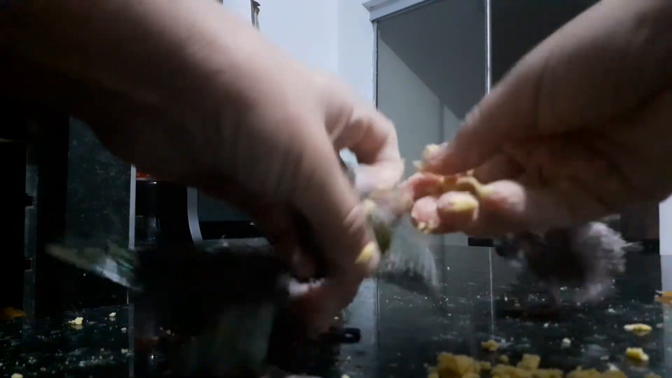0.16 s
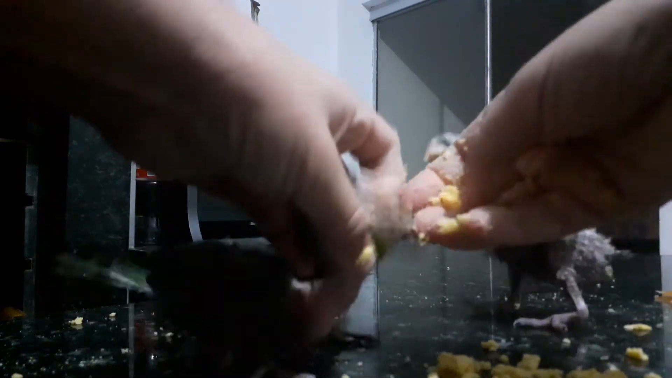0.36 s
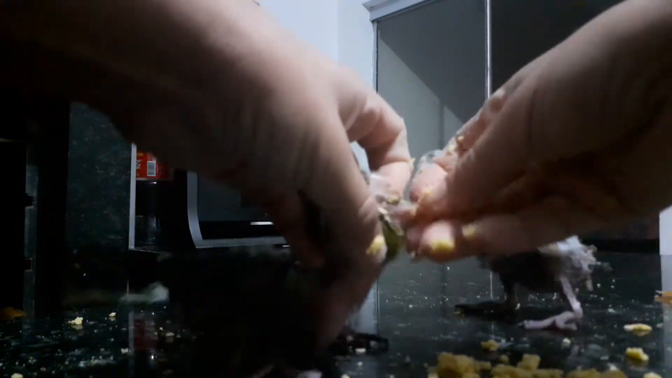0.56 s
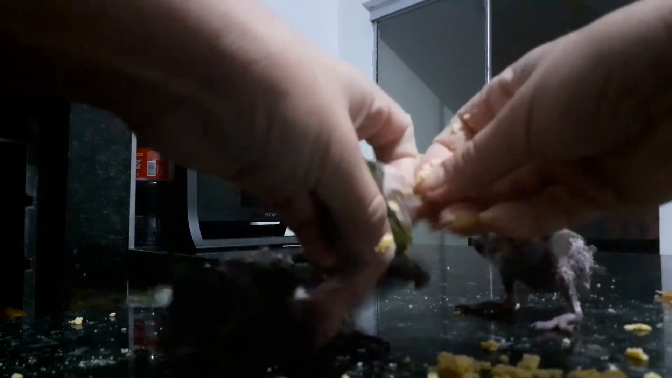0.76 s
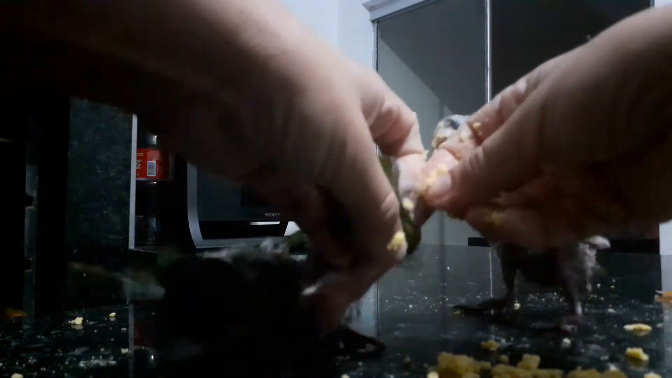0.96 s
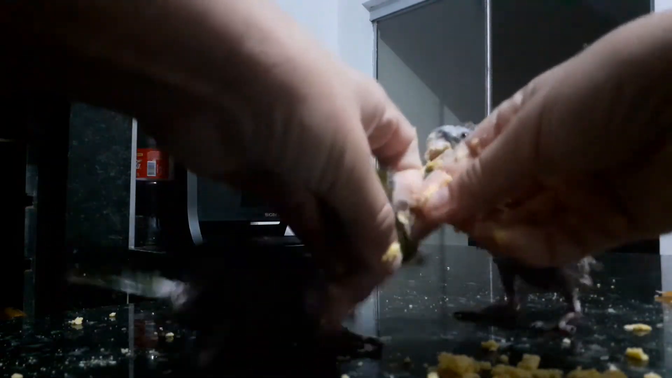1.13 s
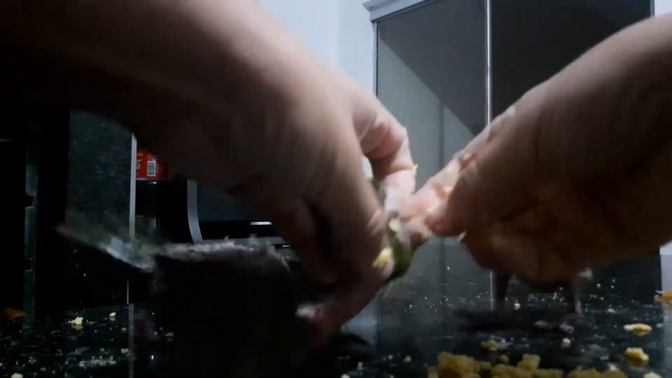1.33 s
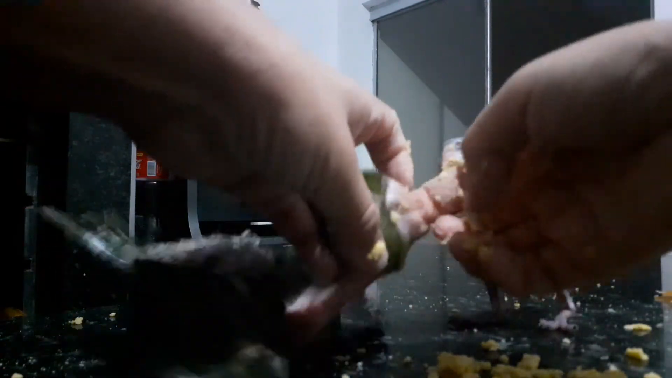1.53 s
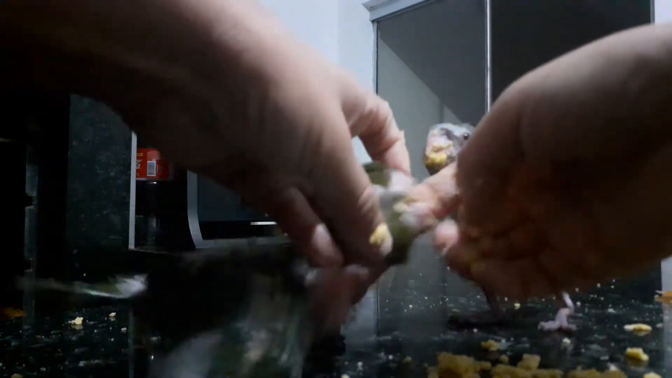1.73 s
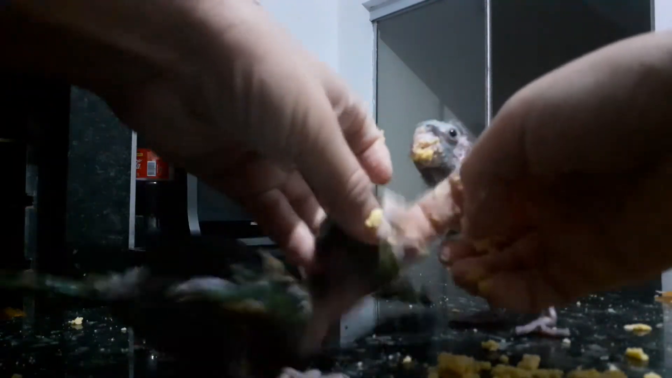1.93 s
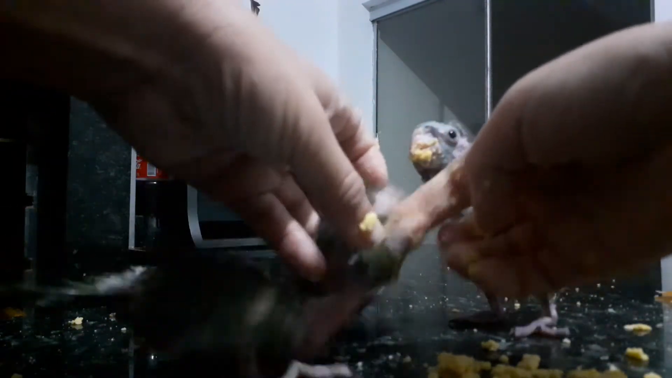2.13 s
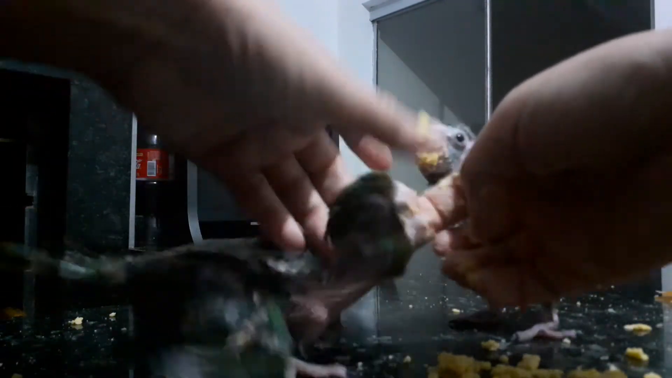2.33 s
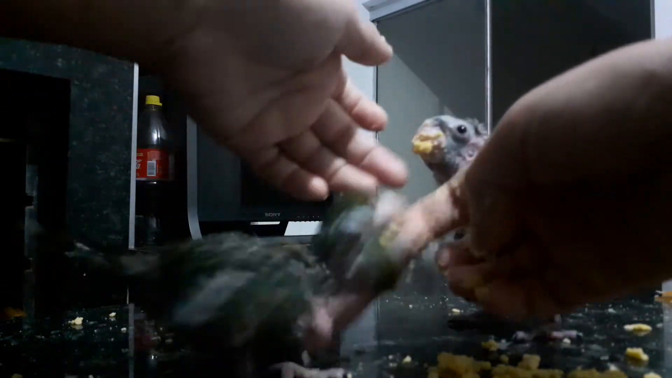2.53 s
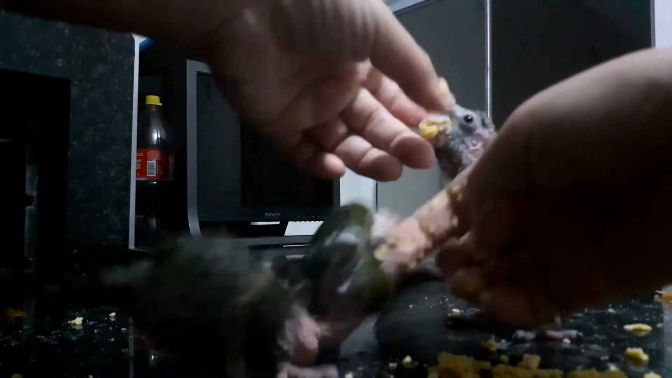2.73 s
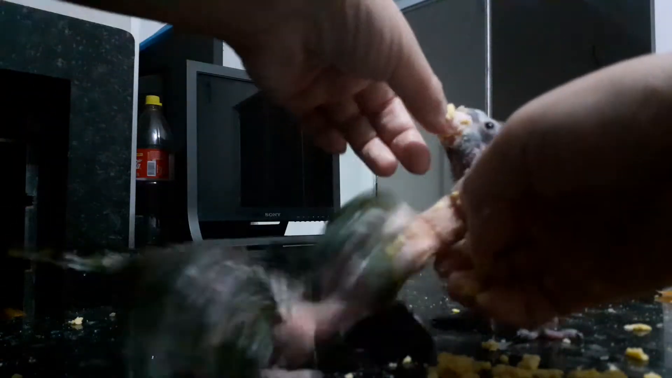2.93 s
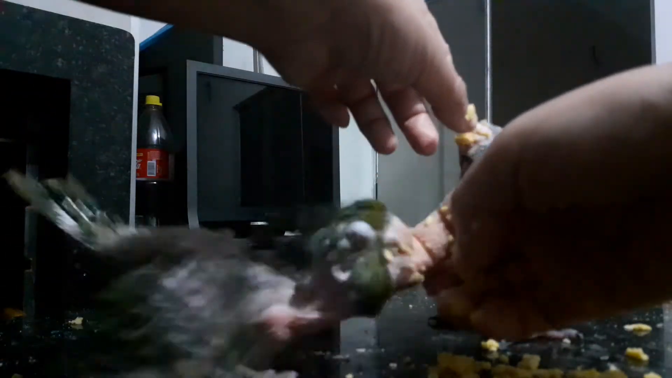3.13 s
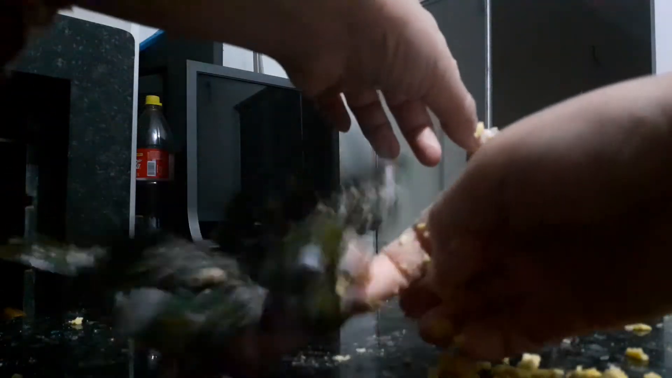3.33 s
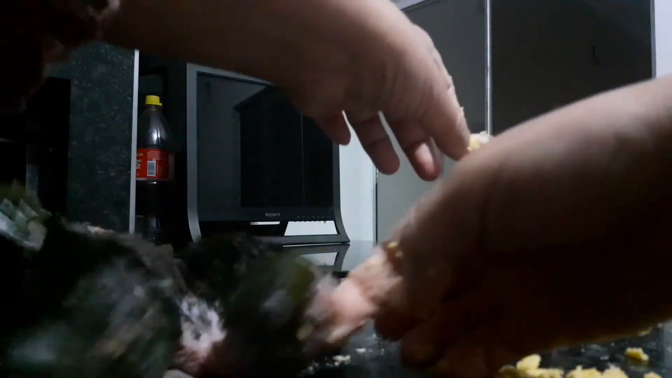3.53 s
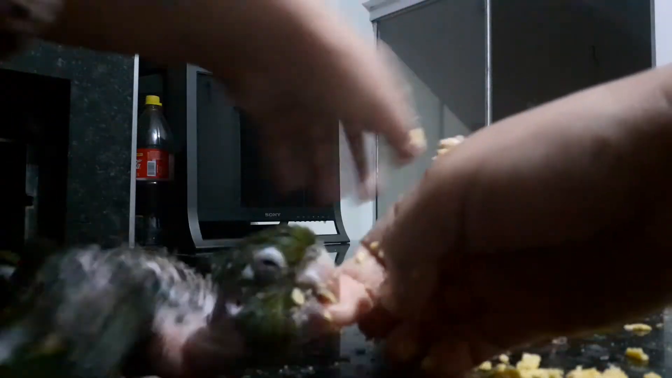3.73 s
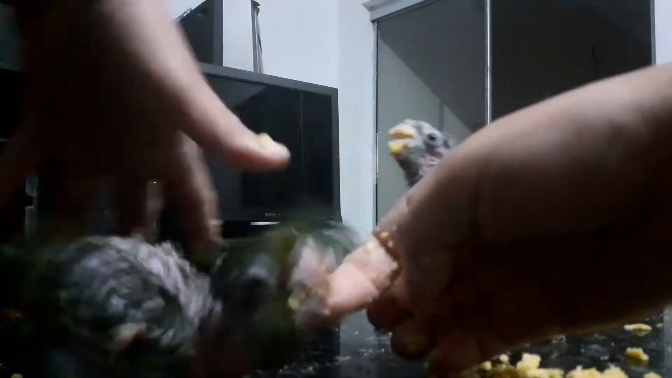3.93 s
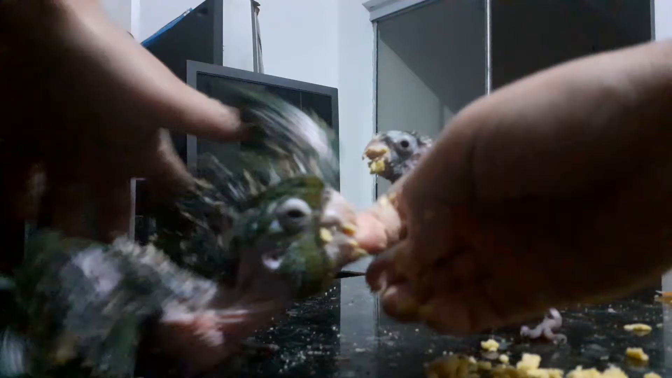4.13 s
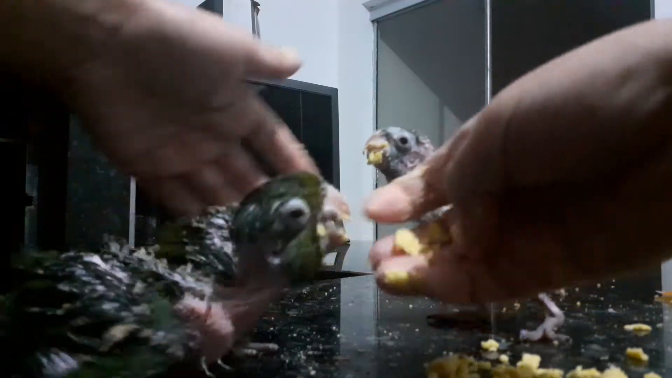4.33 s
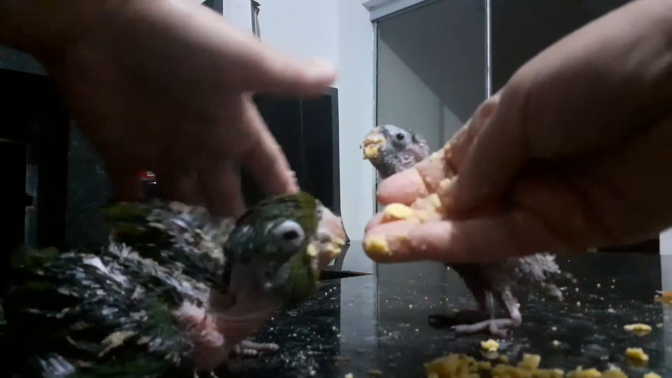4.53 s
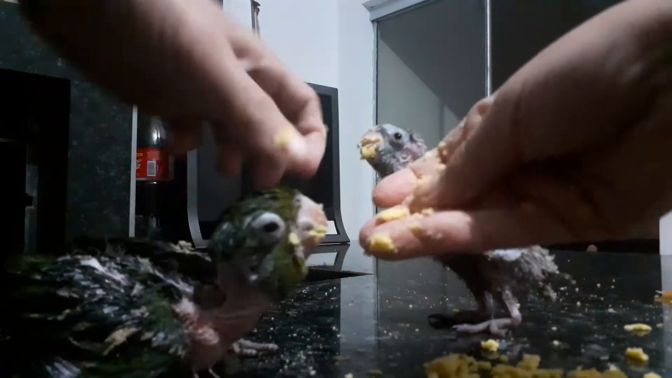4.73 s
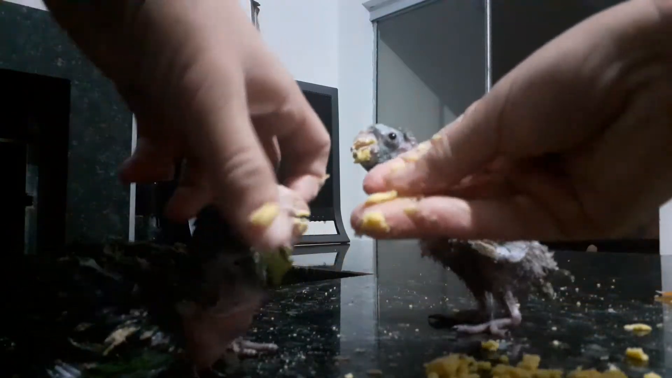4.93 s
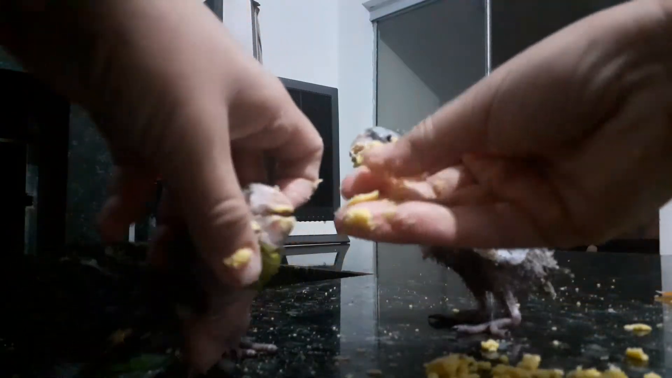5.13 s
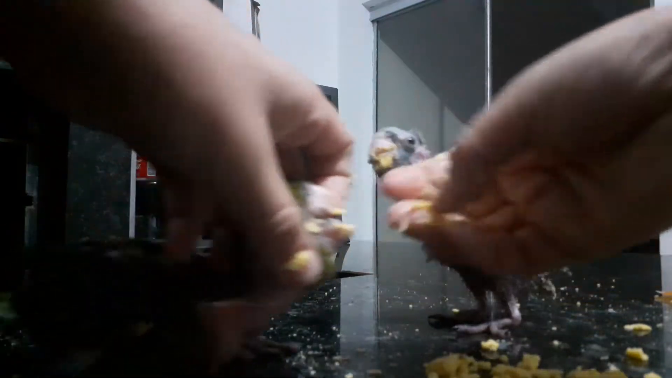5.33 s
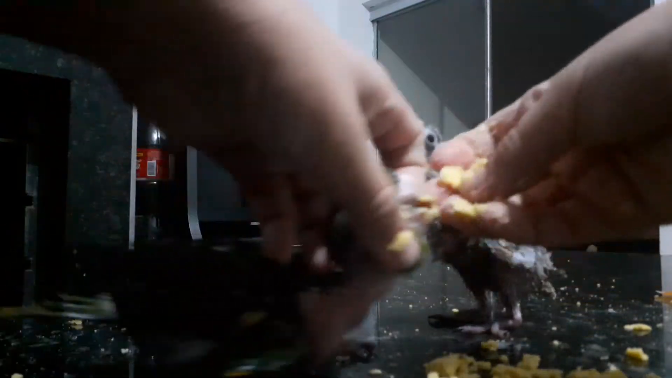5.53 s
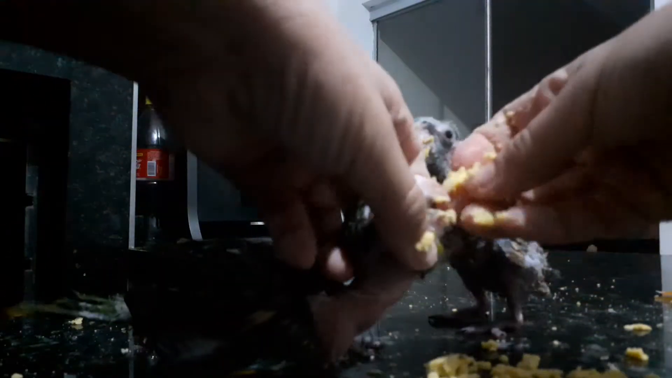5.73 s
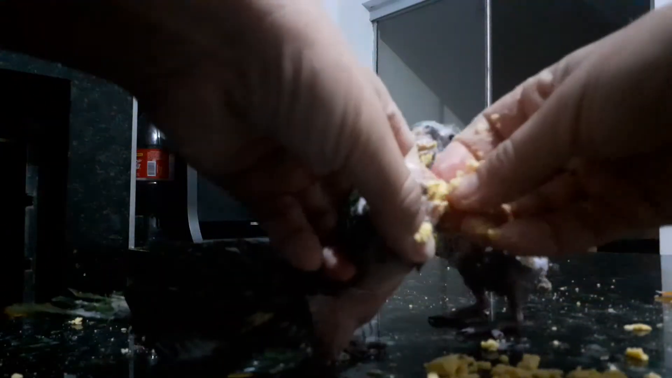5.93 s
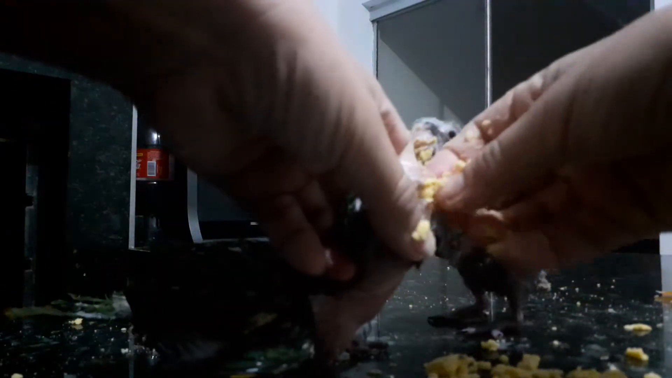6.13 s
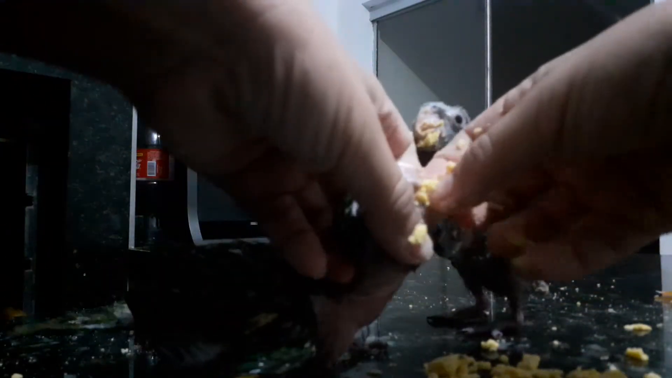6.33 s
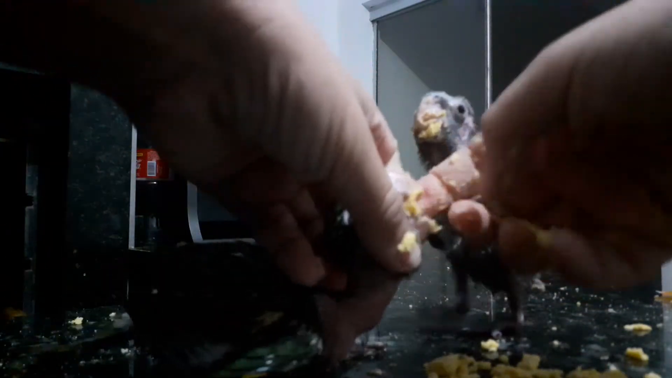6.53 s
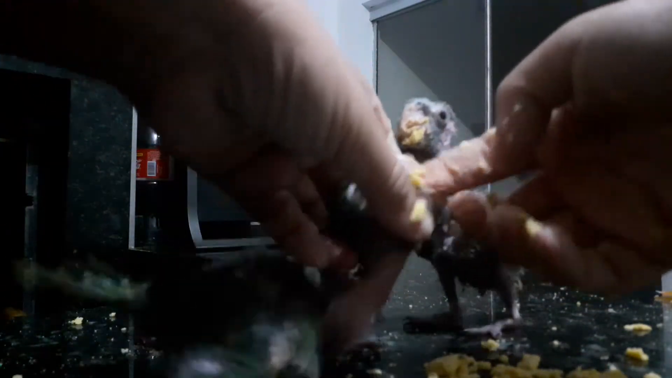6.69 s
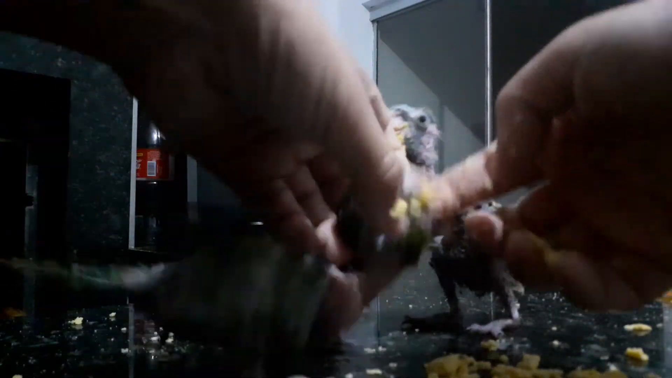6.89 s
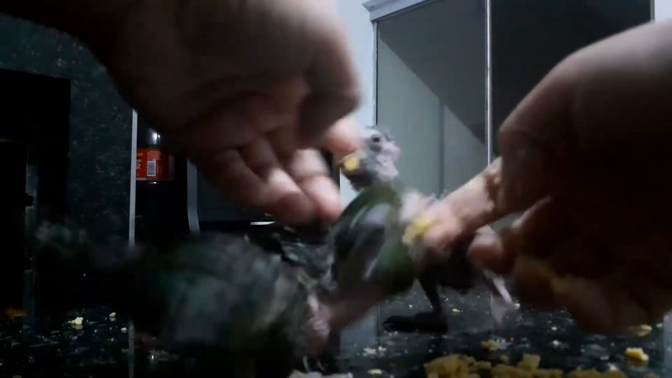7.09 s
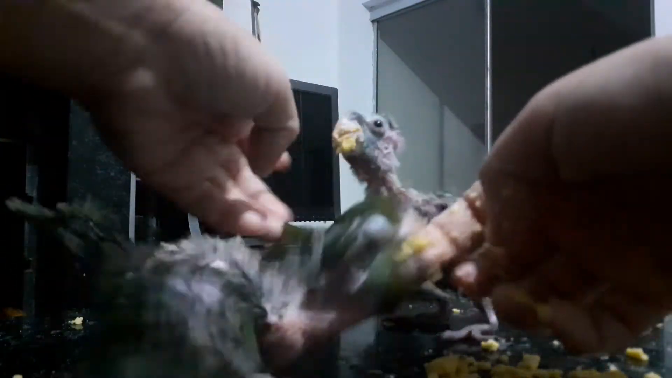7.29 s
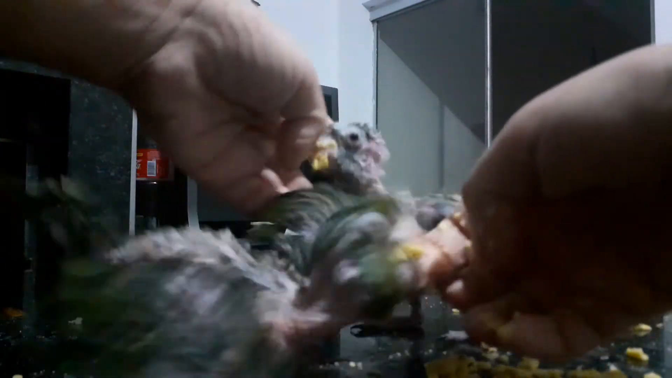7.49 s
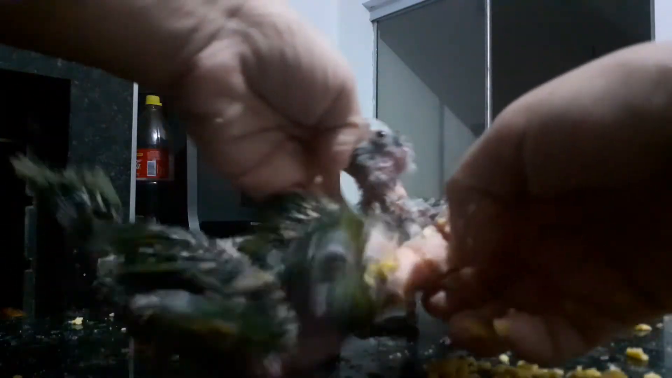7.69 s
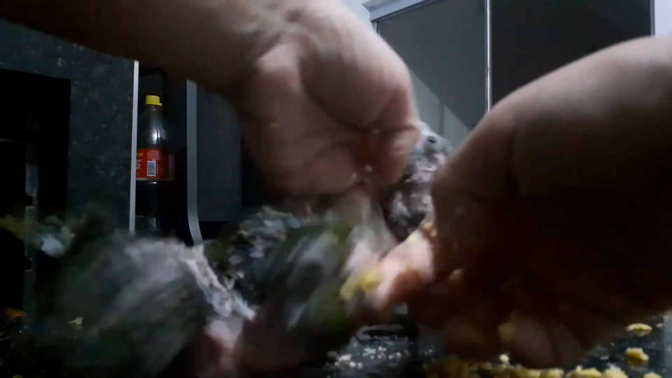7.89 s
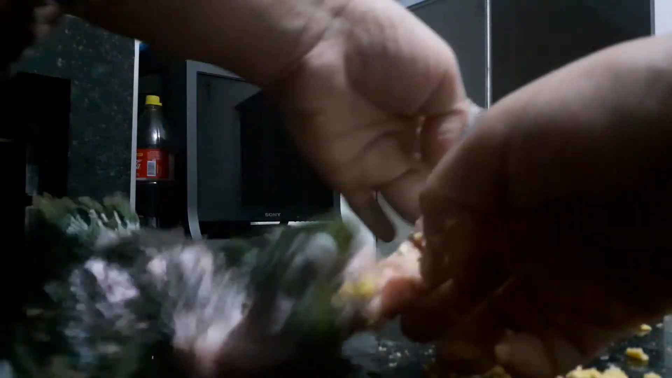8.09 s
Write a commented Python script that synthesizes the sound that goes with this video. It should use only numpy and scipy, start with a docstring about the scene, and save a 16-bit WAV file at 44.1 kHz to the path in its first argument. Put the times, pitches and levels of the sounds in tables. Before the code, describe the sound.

A steady appliance hum with soft rushing air lies under the begging of two hand-fed parrot chicks on a countertop. Both rattle together at first, then the near one continues alone, dipping quieter before growing stronger and harsher. After a pause filled only by hum and one barely audible beak click, it restarts with a few clearer, higher chirps and returns to rasping. Close stereo pickup, slightly left, short bright room echo.

```python
"""Two begging parrot chicks

Two parrot chicks beg while they are hand-fed on a stone countertop, close to the microphone, in a hard-walled room.
Each call is a short rattle of pulses from the syrinx (a bird's voice box) that ring the throat, with a rasp of air
in the open beak. The near chick calls, pauses and starts again; its stronger calls are brighter and harsher.
The farther chick joins in for a little over a second. Beaks click on the food: short bursts of coloured noise.
An appliance hums throughout: wavering tones over a rush of air.
"""
import sys
import numpy as np
from scipy import signal
from scipy.fft import rfft, irfft, next_fast_len
from scipy.io import wavfile
from scipy.ndimage import uniform_filter1d, minimum_filter1d

SR = 44100
rng = np.random.default_rng(int(sys.argv[2]) if len(sys.argv) > 2 else 0)


def transcribe(u):
    """Save the signal u as a 16-bit wav file named by the first command-line argument.

    u: samples, shape (n,) or (channels, n), limited to [-1, 1]; the rate is SR.
    q: integer samples, one column per channel.
    """
    v = np.clip(np.atleast_2d(u).T, -1, 1)
    q = np.round(v * 32767).astype(np.int16)
    wavfile.write(sys.argv[1], SR, q)


N = 359415
TIME = np.arange(N) / SR
CALL_SIZE = 4096  # samples set aside for one call or click


def undb(db):
    """Decibels to gain."""
    return 10 ** (np.asarray(db) / 20)


def unit(x):
    """Scale to rms 1."""
    return x / np.sqrt(np.mean(x ** 2) + 1e-20)


def curve(rows, t):
    """Read (t/s, value) rows at time t, with straight lines between them."""
    return np.interp(t, *np.transpose(rows))


def gains(points, size):
    """Gain at each FFT bin from (f/Hz, level/dB) points."""
    point_hz, db = np.transpose(points)
    bin_hz = np.fft.rfftfreq(size, 1 / SR) + 1
    return undb(np.interp(np.log(bin_hz), np.log(point_hz), db))


def colour(x, points):
    """Filter a signal by (f/Hz, level/dB) points."""
    size = next_fast_len(x.shape[-1], True)
    return irfft(rfft(x, size) * gains(points, size), size)[..., :x.shape[-1]]


def walk(rate):
    """Slow random wander with a spread near 1 and `rate` new targets a second."""
    knots = rng.standard_normal(1024)
    return 1.17 * np.interp(TIME * rate, np.arange(len(knots)), knots)


def add(out, s, sound, pan_db, lag_ms):
    """Mix a short sound in at time s; pan is left minus right, and the right channel hears it later."""
    hz = np.fft.rfftfreq(len(sound), 1 / SR)
    late = irfft(rfft(sound) * np.exp(-2j * np.pi * hz * lag_ms / 1000))
    start = int(np.clip(s * SR, 0, N - 1))
    fade = np.clip(np.linspace(5, 0, len(sound)), 0, 1) ** 2  # over the last fifth
    pair = fade * np.array([sound * undb(pan_db / 2), late * undb(-pan_db / 2)])
    out[:, start:start + len(sound)] += pair[:, :N - start]


def appliance(air_db=-46, waver_db=1.5, drift=0.001205, pan_db=3, wide_hz=800):
    """Motor tones that waver a little over the rush of air; the air's bass is more alike in both channels."""
    # motor tones, before waver, swell and pan: f/Hz, level/dB
    hum_tones = [(60, -86.5), (150.7, -67), (209.9, -62), (253, -66), (301.5, -51.5), (336.7, -41.5),
                 (358.5, -55), (379.7, -63), (420.3, -58.5), (463.8, -49), (632, -60), (672.9, -57),
                 (716, -65), (925.9, -67.5)]
    # colour of the lower and upper air noise: f/Hz, level/dB
    air_low = [(30, -35.5), (90, -20.5), (150, -10.5), (200, -8.5), (310, 0), (400, -3), (520, -10.5),
               (680, -12.5), (1250, -21), (2000, -20), (2450, -29), (2950, -22.5), (3800, -48.5),
               (6700, -41.5)]
    air_top = [(9000, -61), (11300, -44), (16000, -50)]
    # slow rise and fall of the whole hum: t/s, level/dB
    hum_swell = [(0, -0.5), (1.7, -2.5), (3, -0.5), (4.5, -3.5), (5.5, -3), (5.85, 1), (6.4, 1.5),
                 (7.2, 0.5), (8.15, -2.5)]
    tones = 0
    for hz, db in hum_tones:
        phase = 2 * np.pi * np.cumsum(hz * (1 + drift * walk(1.5))) / SR
        tones = tones + np.sqrt(2) * undb(db + waver_db * walk(2.65)) * np.sin(phase)
    mid, side = colour(rng.standard_normal((2, N)), air_low + air_top)
    side = unit(side)
    high_pass = signal.butter(1, wide_hz, "high", fs=SR, output="sos")
    side = 0.36 * side + 1.1 * signal.sosfilt(high_pass, side)
    # opposite signs in the two channels make the noise wide
    air = (unit(mid) + np.array([side, -side])) * undb(air_db + .5 * walk(4))
    return (tones + air) * undb(curve(hum_swell, TIME)) * undb([[pan_db / 2], [-pan_db / 2]])


def room(x, wet_db, t60_low=0.74, t60_high=0.55, split_hz=5000):
    """Echo off hard walls as decaying noise, shorter in the treble and unrelated in the two channels."""
    # colour of the echo: f/Hz, level/dB
    room_colour = [(100, -7), (300, -2), (800, 2), (2000, 0), (3000, 4.5), (4200, 9), (6000, 2.5),
                   (9000, 3), (16000, 11)]
    t = np.arange(SR * 3 // 4) / SR
    walls = rng.standard_normal((2, len(t)))
    low = signal.sosfilt(signal.butter(2, split_hz, fs=SR, output="sos"), walls)
    high = walls - low
    tail = low * undb(-60 * t / t60_low) + high * undb(-60 * t / t60_high)
    onset = np.clip(t / 0.0011, 0, 1)
    tail = colour(unit(tail * onset), room_colour) / np.sqrt(len(t))
    return x + undb(wet_db) * signal.fftconvolve(x, tail, axes=1)[:, :N]


def scatter(sound, db, decay_s):
    """Quick reflections off moving hands and the countertop, different for every call."""
    t = np.arange(CALL_SIZE // 4) / SR
    echoes = rng.standard_normal(len(t)) * np.exp(-t / decay_s) * (t > .0008)
    echoes = echoes / np.linalg.norm(echoes)
    return sound + undb(db) * signal.fftconvolve(sound, echoes)[:CALL_SIZE]


def beak_clicks(decay_s=0.0019):
    """Tiny snaps of a beak on the food: noise bursts that die away in milliseconds."""
    # clicks, before colour and pan: t/s, level/dB
    clicks = [(1.357, -42), (3.282, -24), (3.844, -25), (5.152, -44.5), (6.849, -27.5), (7.713, -40),
              (7.897, -43)]
    # colour of a click: f/Hz, level/dB
    click_colour = [(1000, -31), (4000, -3), (7000, 2), (10000, -15), (13000, -5), (16000, -11)]
    out, t = np.zeros((2, N)), np.arange(CALL_SIZE) / SR
    for s, db in clicks:
        burst = rng.standard_normal(CALL_SIZE) * np.exp(-t / decay_s)
        snap = colour(burst, click_colour)
        add(out, s, undb(db) * snap, pan_db=9.0, lag_ms=0.16)
    return out


def body(points):
    """Response with the colour of (f/Hz, level/dB) points that rings only after it is struck."""
    cepstrum = irfft(np.log(gains(points, CALL_SIZE)))
    # folding the second half onto the first leaves no sound ahead of the pulse
    cepstrum[1:CALL_SIZE // 2] *= 2
    cepstrum[CALL_SIZE // 2 + 1:] = 0
    return np.exp(rfft(cepstrum))


def mouth(ring, ring_hz=3050, sharpness=5.8, ring_db=2):
    """The open mouth adds a resonance above the throat's; ring runs from 0 to 1."""
    hz = np.fft.rfftfreq(CALL_SIZE, 1 / SR) + 1
    resonance = 1 / (1 + 1j * sharpness * (hz / ring_hz - ring_hz / hz))
    return 1 + np.clip(ring, 0, 1) * undb(ring_db) * resonance


def syrinx(length, rate_hz, delay, jitter, scatter_db, edge, slowing=0.15, swell=0.95, sag=0.28):
    """One side's pulses: a sudden start, a swell, then slower and weaker as the pressure falls.

    Returns rows of times (s), sizes and beak opening; delay is in pulse periods."""
    chance = rng.standard_normal((2, 24))
    steps = np.arange(24) / rate_hz
    slower = slowing * (np.minimum(steps / length, 1) - .5)
    periods = (1 + slower + jitter * chance[0]) / rate_hz
    times = np.cumsum(periods) - periods[0] + delay / rate_hz
    progress = np.clip(times / length, 0, 1)
    opening = np.abs(np.sin(np.pi * progress ** swell))
    sizes = (edge * (1 - sag * progress ** 2) + opening) * undb(scatter_db * chance[1])
    return np.array([times, sizes, opening])[:, times < length]


def call(pulses, length, throat, throat_hz, sharpness, rasp_db, hiss_db, edge_hz, gape, puff_s, bite,
         lift=0.07, wobble=0.075):
    """Pulses ring the throat, higher as the beak opens; each lets out a puff of air, the strong ones far more."""
    # colour of the rasp through a shut beak: f/Hz, level/dB
    rasp_shut = [(1500, -27), (3300, -5), (4400, 3.5), (5300, -4), (6500, 7.5), (7500, -2), (8400, -3),
                 (11000, -7.5)]
    # what a full gape changes in the rasp: f/Hz, level/dB
    rasp_gape = [(3300, 7), (4400, 2), (5300, 6), (6500, -3), (8400, -10), (11000, -2)]
    # colour of the hiss at the beak: f/Hz, level/dB
    hiss_colour = [(5000, -46.5), (10500, -2.5), (12300, 1.5), (13200, 3), (16000, -0.5)]
    times, sizes, opening = pulses[:, :, None]
    hz = np.fft.rfftfreq(CALL_SIZE, 1 / SR) + 1
    # voice: one sharp snap per pulse, each with its own throat resonance
    snaps = sizes * np.exp(-2j * np.pi * hz * times)
    luck = rng.standard_normal((48, 1))[:len(times)]
    centre = throat_hz * np.exp(lift * (opening - .7) + wobble * luck)
    resonance = 1 / (1 + 1j * sharpness * (hz / centre - centre / hz))
    voice = -irfft(throat * np.sum(snaps * resonance, axis=0))
    # air: a puff that dies away after each pulse
    since = np.arange(CALL_SIZE) / SR - times
    puffs = sizes * (since > 0) * np.exp(-np.abs(since) / puff_s)
    force = np.sum(puffs, axis=0) ** bite
    flow = uniform_filter1d(force, size=150)  # the hiss follows the mean flow of air
    rasp, hiss = np.array([force, flow]) * rng.standard_normal((2, CALL_SIZE))
    beak = gains(rasp_shut, CALL_SIZE) * gains(rasp_gape, CALL_SIZE) ** gape
    top_edge = 1 / np.sqrt(1 + (hz / edge_hz) ** 60)
    rasp = irfft(rfft(rasp) * beak * top_edge)
    hiss = colour(hiss, hiss_colour)
    sound = unit(voice) + undb(rasp_db) * unit(rasp) + undb(hiss_db) * unit(hiss)
    return sound * np.sqrt(length * SR / CALL_SIZE)  # the level then holds over the call's own length


def far_chick(rate_hz=350):
    """A thinner, brighter rattle from behind the hand: two even runs, whose level rises briefly and then fades."""
    # colour of the syrinx pulse: f/Hz, level/dB
    far_throat = [(30, -73), (150, -48), (320, 3), (550, -9.5), (1100, 1), (1500, -1.5), (2500, -1),
                  (3400, 0.5), (4000, -9.5), (5000, -13.5), (7000, -20.5), (11000, -30.5)]
    # runs of calls: from t/s, until t/s, time between calls/s
    far_runs = [(0.005, 0.71, 0.0607), (0.925, 1.22, 0.0675)]
    # level of the voice, before echoes and pan: t/s, level/dB
    far_level = [(0, -29), (0.07, -23), (0.3, -25), (0.68, -26), (0.92, -28.5), (1.2, -32.5)]
    call_s, first_hiss_db, hiss_fall_db_per_s = 0.029, -15.5, 33.5
    out, throat = np.zeros((2, N)), body(far_throat)
    for s in np.concatenate([np.arange(*run) for run in far_runs]):
        pulses = syrinx(call_s, rate_hz, 0, jitter=.04, scatter_db=1.2, edge=.7)
        hiss_db = first_hiss_db - hiss_fall_db_per_s * s
        sound = call(pulses, call_s, throat, throat_hz=2330, sharpness=0.43, rasp_db=-20, hiss_db=hiss_db,
                     edge_hz=7000, gape=.7, puff_s=.0014, bite=1.6)
        sound = scatter(sound, db=-7, decay_s=.004)
        add(out, s, undb(curve(far_level, s)) * sound, pan_db=5.0, lag_ms=0)
    return out


def near_chick(sharpness=1.74):
    """About sixteen calls a second, often strong and weak in turn; effort makes a call faster, brighter, harsher."""
    # calls, with the level of the voice before echoes and pan: t/s, length/s, level/dB
    near_calls = [(0.048, 0.025, -15.5), (0.164, 0.023, -13), (0.232, 0.011, -18.5), (0.285, 0.015, -16),
                  (0.34, 0.019, -18), (0.396, 0.023, -16.5), (0.455, 0.017, -18), (0.51, 0.023, -15.5),
                  (0.569, 0.031, -17.5), (0.628, 0.022, -14.5), (0.693, 0.016, -14.0), (0.744, 0.026, -14),
                  (0.802, 0.026, -15), (0.862, 0.027, -14.0), (0.918, 0.033, -19.0), (0.978, 0.027, -16.5),
                  (1.037, 0.03, -19), (1.095, 0.029, -15.5), (1.16, 0.018, -14.5), (1.217, 0.019, -15.5),
                  (1.275, 0.011, -22), (1.331, 0.015, -16.5), (1.394, 0.008, -23), (1.456, 0.019, -18),
                  (1.518, 0.02, -15.5), (1.644, 0.021, -21.5), (1.778, 0.017, -23), (1.845, 0.017, -20.5),
                  (1.911, 0.014, -22), (1.971, 0.021, -16.5), (2.038, 0.022, -23.5), (2.096, 0.02, -20.0),
                  (2.162, 0.014, -21.5), (2.215, 0.023, -19), (2.285, 0.0079, -19.5), (2.335, 0.026, -19.0),
                  (2.397, 0.026, -20.5), (2.454, 0.03, -18.5), (2.523, 0.026, -18.5), (2.579, 0.031, -20.0),
                  (2.647, 0.028, -16.5), (2.705, 0.031, -18.5), (2.769, 0.03, -13), (2.829, 0.025, -17.5),
                  (2.89, 0.028, -15), (2.95, 0.03, -17.5), (3.011, 0.027, -12.5), (3.083, 0.022, -20.5),
                  (3.14, 0.027, -16.5), (3.214, 0.022, -18), (3.271, 0.028, -14.5), (3.338, 0.024, -14.5),
                  (3.399, 0.022, -17.5), (3.464, 0.026, -13), (3.526, 0.024, -16.5), (3.589, 0.027, -15.5),
                  (3.649, 0.027, -16.5), (3.712, 0.028, -16.5), (3.778, 0.025, -18.5),
                  (3.836, 0.032, -16.5), (3.905, 0.026, -18), (3.968, 0.0293, -16.5), (4.034, 0.029, -17.5),
                  (4.1, 0.029, -16.5), (4.167, 0.026, -17.5), (4.231, 0.024, -18), (4.303, 0.028, -20.0),
                  (4.389, 0.026, -20.5), (6.752, 0.024, -18), (6.802, 0.024, -18.5), (6.861, 0.01, -23.5),
                  (6.913, 0.021, -17.5), (6.968, 0.018, -22.5), (7.027, 0.02, -15), (7.085, 0.02, -20.0),
                  (7.144, 0.027, -15), (7.204, 0.025, -19), (7.261, 0.028, -16.5), (7.321, 0.022, -18),
                  (7.378, 0.025, -13), (7.438, 0.026, -19.5), (7.5, 0.024, -14.5), (7.564, 0.023, -23),
                  (7.621, 0.025, -14.0), (7.699, 0.0063, -24), (7.75, 0.028, -15.5), (7.817, 0.022, -14.5),
                  (7.873, 0.024, -15.5), (7.938, 0.028, -12.5), (8.001, 0.024, -16.5), (8.058, 0.026, -13),
                  (8.122, 0.021, -17)]
    # colour of the syrinx pulse: f/Hz, level/dB
    near_throat = [(30, -54), (100, -38.5), (200, 2.5), (290, 7.5), (420, 1.5), (580, 1), (850, 4),
                   (1250, -0.5), (1650, 0), (2100, 4), (2650, -1), (3100, -13), (3600, -17.5),
                   (6000, -29.5), (11000, -49)]
    # how it holds head and beak, before effort: t/s, throat resonance f/Hz, gape/0-1, hiss level/dB
    posture_rows = [(0, 2210.0, 0.57, -27), (0.799, 2260, 0.57, -41), (1.299, 2120, 0, -43),
                    (1.8, 1880, 0, -42), (2.5, 1560, 0.28, -37.5), (3.149, 1850, 0.34, -38),
                    (3.45, 1960, 0.67, -41), (3.751, 1620, 0.85, -40), (4.15, 2010, 0.82, -32.5),
                    (4.4, 2150, 0.96, -30), (6.75, 1270, 0.28, -27), (6.92, 1210, 0.3, -31),
                    (7.1, 1640.0, 0.37, -36), (7.55, 1630, 0.21, -36), (7.801, 2070, 0.08, -47),
                    (8.15, 2010, 0.63, -45)]
    # top edge of the rasp: t/s, f/Hz
    rasp_edge = [(0, 11500), (1.4, 9300), (3.4, 9100), (4.3, 8100), (6.8, 9200), (7.5, 9100), (8.1, 8500)]
    # where the head is, left minus right: t/s, level/dB
    head_pan = [(0, 5.5), (1.1, 4.5), (1.7, 6), (2.3, 5.5), (3.2, 3.5), (3.8, 0), (4.3, 5.5), (6.8, 6),
                (7.4, 4.5), (8.1, 1)]
    # how late the call reaches the right channel: t/s, delay/ms
    head_lag = [(0, .02), (1.3, .055), (3.0, .06), (3.7, .12), (4.15, .07), (6.7, .055), (7.4, .06),
                (7.8, .09)]
    # ordinary call: pulse rate, strength of the second side (0-1), and their spreads between calls
    pulse_hz, pulse_spread, second_side, second_spread = 280.27, 0.0373, 0.76, 0.15
    # change per dB of effort: shares for throat and pulse rate, dB for rasp and hiss, second side's strength
    throat_rise, rate_rise, rasp_rise_db, hiss_rise_db, second_rise = 0.031, 0.018, 1.28, 0.5, 0.19
    # first pulse against the mid-call swell, and its growth per dB of effort
    attack, attack_rise_db = 1.05, 0.7
    # periods by which the second side starts late, and how much sooner per dB of effort
    second_delay, second_sooner = 1.25, 0.2814
    # with the beak shut, added by a full gape (and for the ring, per dB of effort)
    rasp_shut_db, rasp_gape_db = -30, 18
    ring_shut, ring_gape, ring_rise = 0.19, 0.97, 0.073

    out, throat = np.zeros((2, N)), body(near_throat)
    levels = np.array(near_calls)[:, 2]
    # effort: a call's level above the calls around it, in dB
    efforts = np.clip(levels - uniform_filter1d(levels, size=5), -3, 3)
    when, *posture = np.transpose(posture_rows)
    chance = rng.standard_normal((len(levels), 2))
    for (s, length, db), effort, (rate_luck, second_luck) in zip(near_calls, efforts, chance):
        length = np.clip(length, .003, .06)
        throat_hz, gape, hiss_db = (np.interp(s, when, column) for column in posture)
        rate_hz = pulse_hz * (1 + rate_rise * effort + pulse_spread * rate_luck)
        second = np.clip(second_side + second_rise * effort + second_spread * second_luck, 0, 1)
        if 4.28 < s < 4.5:  # the pulses slow in the last calls before the pause
            rate_hz, second = 243, 0
        if 6.79 < s < 7.0:  # a few clear calls an octave up as the begging starts again
            rate_hz, second = 579.4, 0
        edge = attack * undb(attack_rise_db * effort)
        first = syrinx(length, rate_hz, 0, jitter=0.044, scatter_db=1.5, edge=edge)
        delay = max(second_delay - second_sooner * effort, .3)
        other = syrinx(length, rate_hz * 1.13, delay, jitter=0.1382, scatter_db=2.0, edge=edge)
        other = other * [[1], [second], [1]]  # only the sizes change
        ring = ring_shut + ring_gape * gape + ring_rise * effort
        rasp_db = rasp_shut_db + rasp_gape_db * gape + rasp_rise_db * effort
        sound = call(np.hstack([first, other]), length, throat * mouth(ring),
                     throat_hz * (1 + throat_rise * effort), sharpness, rasp_db,
                     hiss_db + hiss_rise_db * effort, curve(rasp_edge, s), gape, puff_s=0.0027, bite=2.44)
        sound = scatter(sound, db=-13, decay_s=.0035)
        add(out, s, undb(db) * sound, curve(head_pan, s), curve(head_lag, s))
    return out


def scene():
    """Both chicks and their beaks in the room, over the hum."""
    near = room(near_chick() + beak_clicks(), wet_db=-14.5)
    far = room(far_chick(), wet_db=-9)
    return near + far + appliance()


def record(channels_in):
    """The two channels differ in colour; a fast limiter holds the highest peaks and the top is cut."""
    # colour of the right channel against the left: f/Hz, level/dB
    right_colour = [(100, 1.5), (800, 1), (2300, 0), (4300, 8), (6500, 4), (8600, 15.5), (9800, -9.5),
                    (11300, 1.5), (16000, -4.5)]
    top_hz = 15900
    channels = np.array([channels_in[0], colour(channels_in[1], right_colour)])
    headroom = 1 / np.maximum(np.abs(channels).max(axis=0), 1)
    gain = uniform_filter1d(minimum_filter1d(headroom, size=129), size=129)
    low_pass = signal.ellip(10, .2, 80, top_hz, fs=SR, output="sos")
    return signal.sosfilt(low_pass, channels * gain)


dry = scene()
out = record(dry)
transcribe(out)
```